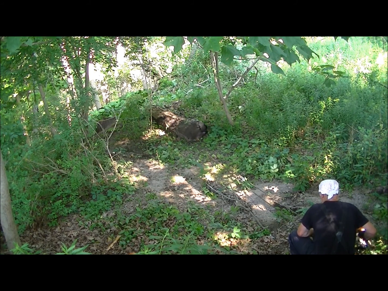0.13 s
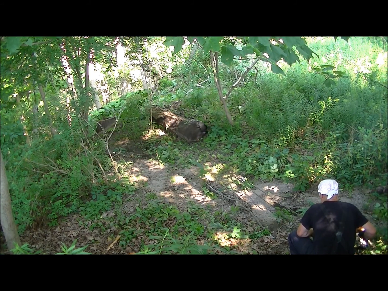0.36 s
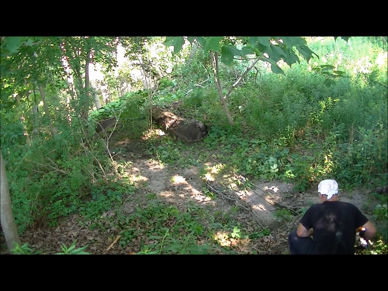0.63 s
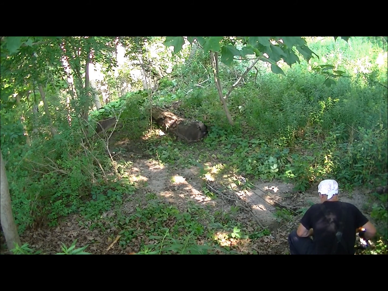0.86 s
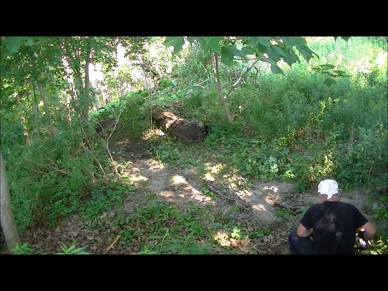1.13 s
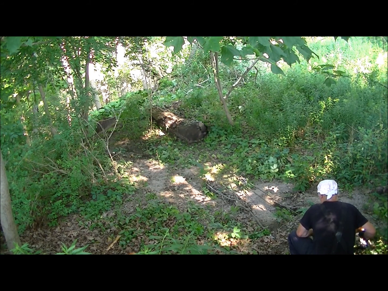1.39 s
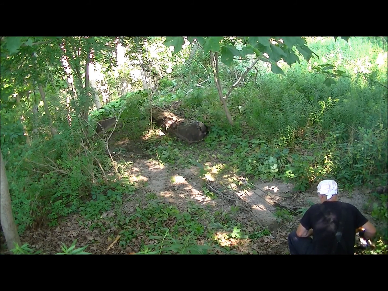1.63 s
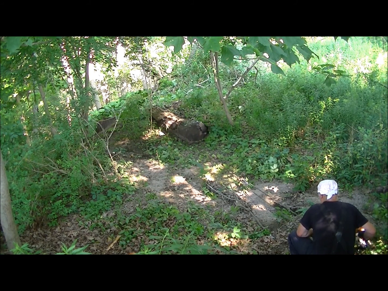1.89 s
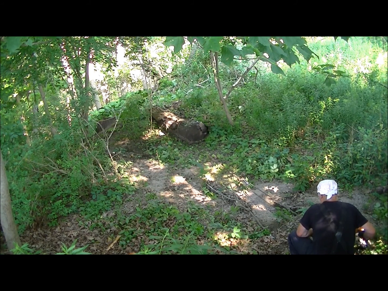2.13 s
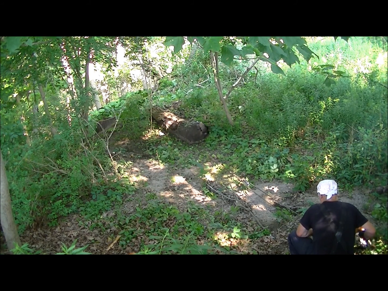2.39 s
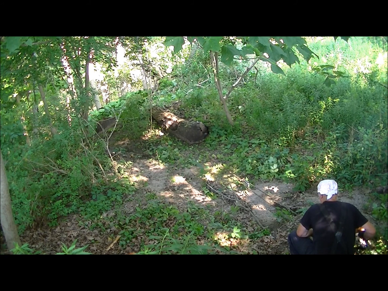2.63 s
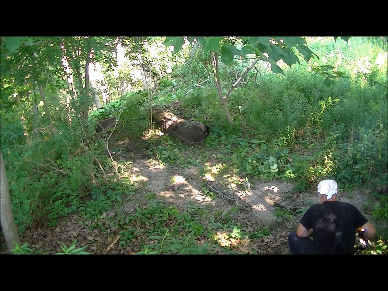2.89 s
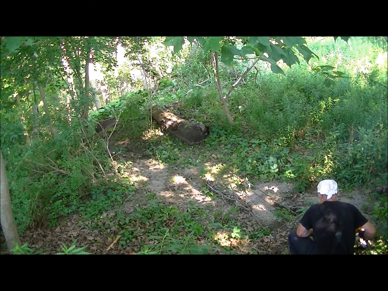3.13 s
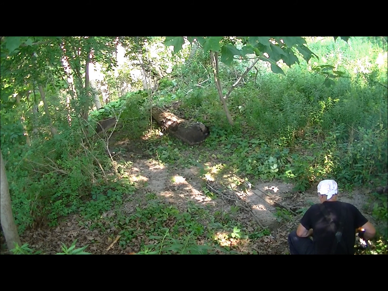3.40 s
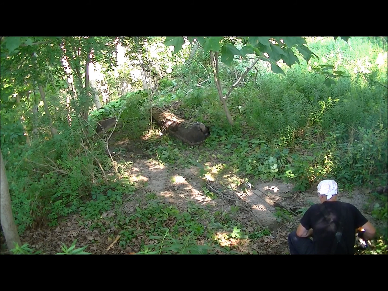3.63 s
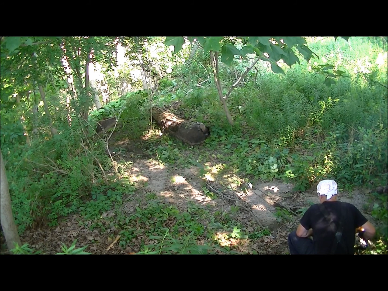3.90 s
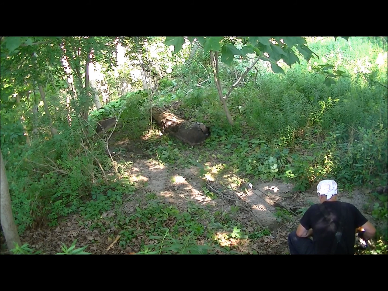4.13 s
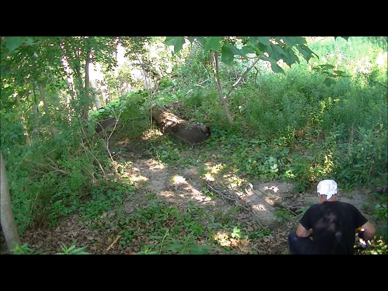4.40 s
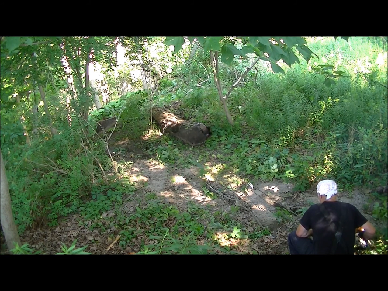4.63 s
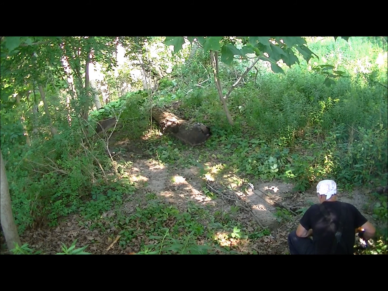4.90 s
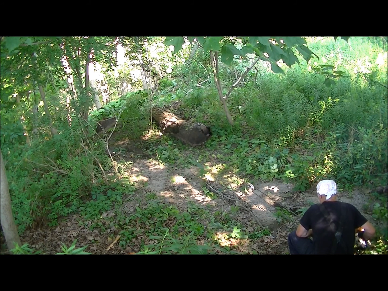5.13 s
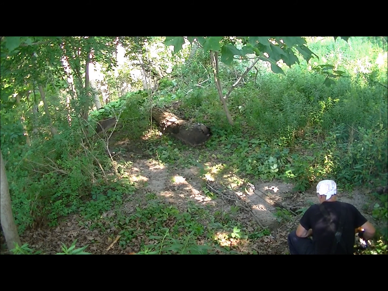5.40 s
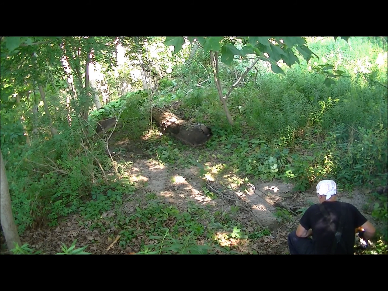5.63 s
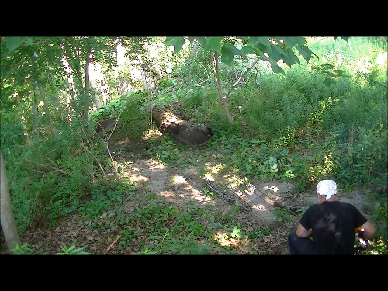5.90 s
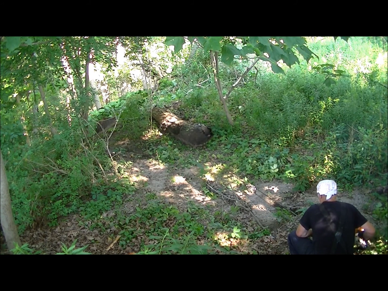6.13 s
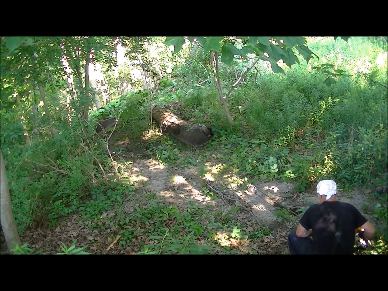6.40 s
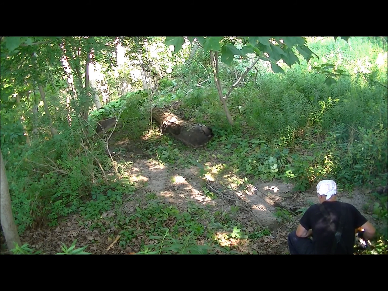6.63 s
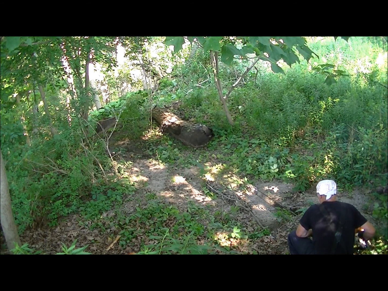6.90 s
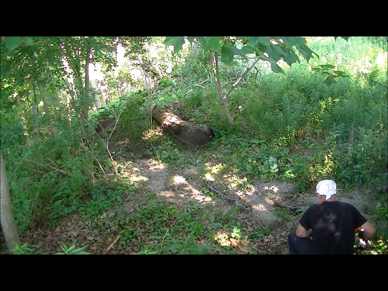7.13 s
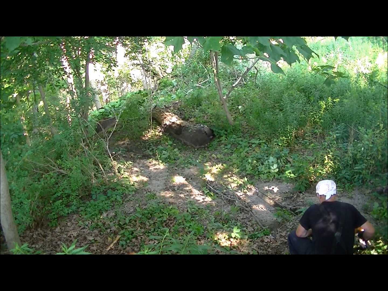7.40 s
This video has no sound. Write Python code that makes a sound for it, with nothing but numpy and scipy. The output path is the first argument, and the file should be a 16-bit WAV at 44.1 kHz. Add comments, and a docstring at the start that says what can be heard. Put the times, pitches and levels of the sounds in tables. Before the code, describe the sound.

A small two-stroke engine screams steadily at high speed under load, close by outdoors, with a raspy buzzing exhaust, gear whine and rough mechanical roar.

```python
"""Two-stroke winch in a clearing

A small two-stroke engine pulls a winch in a wooded clearing, close to the microphone. It runs rich, so it burns well
only on every second turn; now and then the good burn slips over to the other turn. Each turn puffs through the
muffler, each good burn knocks the cylinder fins; fan and gears whine, and shaped noise roars beneath."""
import sys
import numpy as np
from scipy import signal
from scipy.fft import rfft, irfft, next_fast_len
from scipy.io import wavfile
from scipy.ndimage import map_coordinates

SR = 44100
rng = np.random.default_rng(int(sys.argv[2]) if len(sys.argv) > 2 else 0)


def store_pcm(level_fs):
    """Save levels as 16-bit WAV."""
    pcm = np.round(np.clip(level_fs, -1, 1) * 32767).astype(np.int16)
    wavfile.write(sys.argv[1], SR, np.atleast_2d(pcm).T)


def how_loud(loudness_db):
    """Turn decibels into a plain amplitude multiplier (0 dB gives 1, 20 dB gives 10)."""
    steps = np.asarray(loudness_db, float) / 20
    return 10 ** steps


N = 331191  # samples, 7.51 s


def unit(x):
    """x at rms 1."""
    return x / np.sqrt(np.mean(x ** 2) + 1e-20)


def along(points, hz):
    """(Hz, value) points read on a log frequency axis."""
    f, value = np.transpose(points)
    return np.interp(np.log(hz + 1), np.log(f + 1), value)


def over_time(rows):
    """(s, value) points read at every sample."""
    s, value = np.transpose(rows)
    return np.interp(np.arange(N) / SR, s, value)


def wobble(rate):
    """A smooth random curve, rate knots a second."""
    knots = rng.standard_normal(int(N * rate / SR) + 4)
    return map_coordinates(knots, [np.arange(N) * rate / SR])


def filtered(x, response):
    """x shaped by a complex response of frequency."""
    size = 2 * next_fast_len(N // 2 + 4096)
    hz = np.fft.rfftfreq(size, 1 / SR)
    return irfft(rfft(x, size) * response(hz), size)[..., :N]


def causal(gain_db):
    """The minimum-phase response with this gain: it rings after its cause, never before."""
    cepstrum = irfft(gain_db * np.log(10) / 20)
    half = len(cepstrum) // 2
    cepstrum[1:half] *= 2
    cepstrum[half + 1:] = 0
    return np.exp(rfft(cepstrum))


def pulses(times, sizes):
    """Impulses placed between samples by a windowed sinc."""
    at = times[:, None] * SR
    taps = np.floor(at) + np.arange(-8, 9)
    kernel = np.sinc(taps - at) * np.cos((taps - at) * np.pi / 18) ** 2
    places = np.clip(taps, 0, N).astype(int)
    return np.bincount(places.ravel(), (kernel * sizes[:, None]).ravel(), N + 1)[:N]


def after_each(times, sizes, delay, t60):
    """An envelope that jumps up at each time and dies away by 60 dB in t60 seconds."""
    t = np.arange(SR // 20) / SR
    shape = how_loud(-60 * t / t60) * (1 - np.exp(-t / 0.00037))
    return np.abs(signal.fftconvolve(pulses(times + delay, sizes), shape))[:N]


# drifting speed of the crankshaft: t/s, turns per s
SHAFT_SPEED = [(0.0, 134.7), (0.96, 134.87), (1.12, 136.87), (1.28, 135.44), (1.44, 135.6), (1.52, 133.62),
               (1.84, 136.84), (2.0, 136.79), (2.16, 134.25), (2.24, 135.43), (2.4, 134.28), (2.56, 136.99),
               (2.64, 134.6), (2.8, 136.32), (2.96, 136.52), (3.12, 135.72), (3.68, 135.09), (3.84, 137.03),
               (4.08, 135.96), (4.16, 137.52), (4.24, 136.18), (4.56, 136.73), (4.64, 135.45),
               (4.8, 136.08), (4.96, 137.46), (5.12, 136.04), (5.36, 136.15), (5.68, 134.7), (5.76, 136.13),
               (6.08, 137.78), (6.48, 134.23), (6.64, 137.22), (7.04, 136.01), (7.2, 134.44), (7.28, 136.0),
               (7.51, 136.15)]


def crank():
    """Crankshaft turns counted from the first puff; the shaft runs a little ahead or behind."""
    first_puff, shudder = .3, .004  # turns
    return np.cumsum(over_time(SHAFT_SPEED)) / SR - first_puff + shudder * wobble(15)


# the good burn slips over to the other turn: t/s, time scale of the change/s
BURN_SLIPS = [(0.52, 0.027), (1.393, .025), (1.75, 0.01), (1.79, .012), (3.435, 0.015), (3.464, .015),
              (3.556, 0.032), (4.125, .01), (5.032, 0.02), (5.51, .012), (7.025, 0.012), (7.2, .012),
              (7.22, .012)]
# a good burn falters without slipping: t/s, share lost 0-1
BURN_STUMBLES = [(1.495, .35), (2.8, 0.7), (4.226, 0.1), (4.372, 0.8), (4.688, 0.1), (5.09, 0.4),
                 (6.039, .4), (6.487, .2), (7.354, 0.4), (7.486, .35)]


def lean(t):
    """Which turn burns better: +1 even turns, 0 both alike, -1 odd turns."""
    stumble_s = 0.016
    side = np.prod([np.tanh((s - t) / length) for s, length in BURN_SLIPS], axis=0)
    lost_share = sum(lost * np.exp(-((t - s) / stumble_s) ** 2) for s, lost in BURN_STUMBLES)
    return side * (1 - lost_share)


def turns(turned):
    """Time of each exhaust puff and how far its burn is above (+) or below (-) the mean."""
    count = np.arange(int(turned[-1]))
    times = np.interp(count, turned, np.arange(N) / SR)
    chance = rng.standard_normal((len(count), 2))
    burn = lean(times) * (-1.) ** count + 0.047 * chance[:, 0]
    return times + .000004 * chance[:, 1], burn


# the housing lets shaft tones out unevenly, so they swell and fade with speed: f/Hz, level/dB before trim
HOUSING_LEVEL = [(2010, -28), (2025, -29), (2036, -32), (2047, -31.5), (2058, -29.5), (2067, -33),
                 (2279, -48), (2288, -40), (2300, -32), (2309, -33), (2319, -39), (2329, -36), (2338, -32)]


def whine(turned):
    """Fan blades and gear teeth pass a fixed number of times a turn and sound through the housing."""
    blades, teeth = 15, 17
    blade_lead, tooth_lead = .045, .029  # turns by which they pass ahead of the puff
    fan_trim_db, gear_trim_db = -2, 2
    fan_waver_db, gear_waver_db = 1, 3
    speed, angle = over_time(SHAFT_SPEED), 2 * np.pi * turned
    fan_db = along(HOUSING_LEVEL, blades * speed) + fan_trim_db + fan_waver_db * wobble(14)
    # the gear waver only dips
    gear_db = along(HOUSING_LEVEL, teeth * speed) + gear_trim_db - gear_waver_db * np.abs(wobble(11))
    fan = how_loud(fan_db) * np.sin(blades * (angle + 2 * np.pi * blade_lead))
    gear = how_loud(gear_db) * np.sin(teeth * (angle + 2 * np.pi * tooth_lead))
    return np.sqrt(2) * (fan + gear)


# spectrum of fan, chain and gears, relative: f/Hz, level/dB per Hz
ROAR_SPECTRUM = [(30, -39.5), (150, -41), (330, -24.5), (600, -13), (800, -9.5), (1000, -4), (1400, -5.5),
                 (1800, -1), (2250, -2), (2900, -7), (3700, -4.5), (5000, -7.5), (6200, -10), (7300, -17),
                 (9000, -22.5), (11000, -35.5), (13600, -44), (14800, -51)]
# bands where the roar is louder, some near shaft orders blurred by the drifting speed: f/Hz, width/Hz, boost/dB
LOUDER_BANDS = [(2026, 260, 1.5), (2470, 71, 4), (2570, 27, 5.5), (3240, 52, 3), (4205, 460, 3.5),
                (6300, 340, 1.5)]


def roar(times, burn):
    """Fan, chain and gear noise, spiky as clattering links, swells at each puff and more at a good burn."""
    level_db, waver_db = -25.5, 0.4
    alike_rise_db = 2.5  # rise while neither turn burns better
    swell = 1 + 0.21 * after_each(times, how_loud(9.2 * burn), -0.00014, 0.035)
    clatter = 1 + 0.27 * rng.standard_normal(N) ** 2

    def colour(hz):
        boost_db = sum(db / (1 + (2 * (hz - c) / w) ** 2) for c, w, db in LOUDER_BANDS)
        return causal(along(ROAR_SPECTRUM, hz) + boost_db)

    noise = filtered(swell * clatter * rng.standard_normal(N), colour)
    alike = 1 - np.abs(lean(np.arange(N) / SR))
    return how_loud(level_db + alike_rise_db * alike + waver_db * wobble(6)) * unit(noise)


# muffler and casing answer shared by all turns: f/Hz, rms level of a shaft order there/dB
PUFF_ORDERS = [(136, -64), (272, -56.5), (408, -66), (539, -43), (548, -40), (680, -36.5), (816, -34.5),
               (952, -43.5), (1088, -34), (1224, -53.5), (1347, -49.5), (1370, -44), (1482, -42),
               (1507, -41), (1616, -41.5), (1644, -42.5), (1751, -55.5), (1781, -33.5), (1904, -42.5),
               (2040, -41), (2155, -40.5), (2192, -43.5), (2290, -58.5), (2329, -43), (2424, -35.5),
               (2466, -45), (2559, -51), (2603, -57), (2694, -36.5), (2740, -41.5), (2856, -73),
               (2963, -46.5), (3014, -52), (3128, -50), (3264, -45), (3400, -69.5), (3536, -43.5),
               (3672, -60), (3808, -53), (3944, -73), (4080, -65), (4216, -48), (4352, -41), (4488, -48)]
# what a good burn adds and a poor one lacks: f/Hz, rms level of a half order there/dB
BURN_ORDERS = [(68, -100), (204, -60), (340, -51), (476, -47.5), (612, -42.5), (741, -53.5), (754, -47),
               (884, -43), (1020, -41.5), (1145, -41), (1165, -45.5), (1280, -76), (1302, -45.5),
               (1414, -48.5), (1439, -67), (1564, -51.5), (1700, -52), (1818, -41), (1850, -39.5),
               (1953, -56.5), (1987, -43.5), (2108, -35), (2244, -58.5), (2357, -48), (2398, -50),
               (2516, -45), (2626, -54), (2672, -45), (2761, -57), (2809, -61), (2896, -62), (2946, -44),
               (3060, -45)]
# how early or late each part of the puff's spectrum sounds, which slants the pulse: f/Hz, delay/s (- is ahead)
PULSE_SLANT = [(200, -.001), (290, .0015), (400, .011), (530, .005), (575, -.003), (640, .002), (720, 0),
               (1100, -.0003), (1250, -.003), (1450, -.0025), (1550, -.0012), (1850, -.0012), (2000, .0011),
               (2300, -.0001), (2700, -.0005)]


def exhaust(times, burn):
    """One puff a turn through the muffler, plus a part that follows the quality of the burn."""
    per_order = SR / (np.sqrt(2) * 136)  # unit pulses at 136 a second give orders of rms 1

    def muffler(table, top_hz):
        skirted = [(20, -110), *table, (top_hz, -75), (12000, -110)]

        def response(hz):
            # phase is the running sum of delay over frequency
            slant = np.exp(-2j * np.pi * np.cumsum(along(PULSE_SLANT, hz)) * hz[1])
            return slant * causal(along(skirted, hz))
        return response

    sizes = how_loud(0.12 * rng.standard_normal(len(times)))
    puff = filtered(pulses(times, sizes), muffler(PUFF_ORDERS, 4840))
    extra = filtered(pulses(times, burn), muffler(BURN_ORDERS, 3750))
    return per_order * (puff + extra)


# cylinder fins rung by the knock: f/Hz, width/Hz, relative level/dB
CYLINDER_FINS = [(4380, 920, -15), (6490, 860, 2.5), (8460, 1340, 1), (11400, 2300, -37)]
# pull of the cable, heard as the strength of the knock: t/s, level/dB
CABLE_LOAD = [(0, -38.5), (.45, -39.5), (.62, -38), (1.0, -39), (1.4, -41), (1.6, -39), (2.1, -41.5),
              (2.5, -37), (2.85, -39), (3.15, -38.5), (3.36, -36.5), (3.55, -41), (4.05, -38.5),
              (4.35, -43), (4.72, -39.5), (4.87, -42.5), (5.4, -43.5), (5.8, -36.5), (6.07, -46),
              (6.33, -47), (6.45, -39), (6.8, -43), (7.17, -39.5), (7.51, -42)]


def knock(times, burn):
    """A good burn strikes the cylinder: a sharp blow, its ground bounce and a weaker rattle ring the fins."""
    waver_db = 0.4
    chance = rng.standard_normal((len(times), 3))
    sizes = how_loud(11 * np.clip(burn - 1, -3, .3) + 1.5 * chance[:, 0])
    # the flame starts a little early or late
    blow = pulses(times + .00105 + .00004 * chance[:, 1], sizes)
    bounce = .2 * pulses(times + .0035 + .00006 * chance[:, 2], sizes)
    rattle = 0.12 * after_each(times, sizes, 0.00054, 0.01) * rng.standard_normal(N)

    def fins(f):
        total = 0
        for k, (c, w, db) in enumerate(CYLINDER_FINS):
            ring = 1j * f * w / (c * c - f * f + 1j * f * w)
            total = total + (-1) ** k * how_loud(db) * ring ** 2  # neighbours in opposite polarity
        return total

    struck = unit(filtered(blow + bounce + rattle, fins))
    return how_loud(over_time(CABLE_LOAD) + waver_db * wobble(8)) * struck


# half the left-right difference, late copy: f/Hz, level against the direct sound/dB
COPY_WIDTH = [(60, -24), (150, -41), (400, -22), (700, -33), (1300, -36), (2100, -24), (2800, -19.5),
              (3600, -25), (4600, -42), (7000, -27), (14000, -33)]


def late_copy(mid):
    """A weak copy of the direct sound, 0.13 ms late, that sets the two ports apart."""
    return filtered(mid, lambda hz: how_loud(along(COPY_WIDTH, hz)) * np.exp(-2j * np.pi * hz * .00013))


# half the left-right difference, scatter off the wood: f/Hz, level against the direct sound/dB
WOOD_SCATTER = [(60, -26), (150, -39), (400, -24), (1300, -33), (2100, -22.5), (2800, -21.5), (3600, -19.5),
                (4600, -27), (7000, -52), (14000, -31)]


def scattered(mid):
    """Sound scattered off leaves and trunks: moving leaves scramble its phase."""
    hz, _, z = signal.stft(mid, SR, nperseg=1024)
    leaves = how_loud(along(WOOD_SCATTER, hz))[:, None] * np.exp(2j * np.pi * rng.random(z.shape))
    # root 2 makes up for scrambled frames that partly cancel where they overlap
    return np.sqrt(2) * signal.istft(z * leaves, SR, nperseg=1024)[1][:N]


def scene():
    """The engine almost straight ahead; a weak late copy and scatter set left and right apart."""
    turned = crank()
    times, burn = turns(turned)
    mid = whine(turned) + roar(times, burn) + exhaust(times, burn) + knock(times, burn)
    side = late_copy(mid) + scattered(mid)
    return np.array([mid + side, mid - side])


def roll_off(x):
    """The treble ends steeply here."""
    return signal.sosfilt(signal.butter(12, 14990, fs=SR, output="sos"), x)


def record(dry):
    """The microphone softens the deepest bass and the highest treble."""
    colour_db = [(30, -4), (70, -0.8), (1500, -1.07), (2200, -0.34), (3600, -0.8), (10000, -0.03),
                 (15000, -3.5)]  # f/Hz, level/dB
    mix = filtered(dry, lambda hz: how_loud(along(colour_db, hz)))
    return roll_off(mix)


dry = scene()
out = record(dry)
store_pcm(out)
```